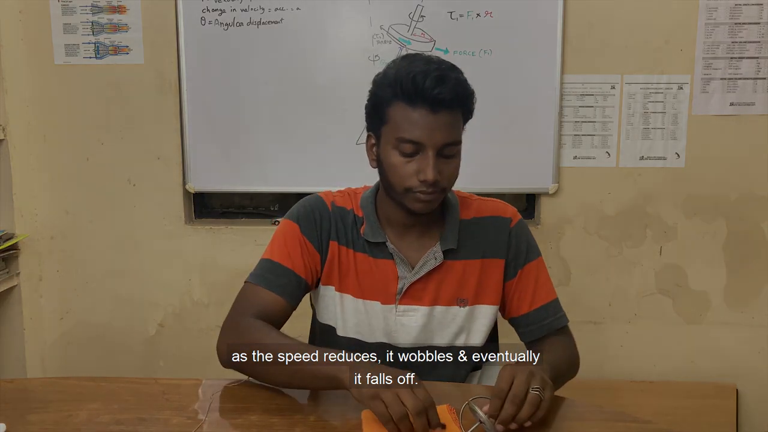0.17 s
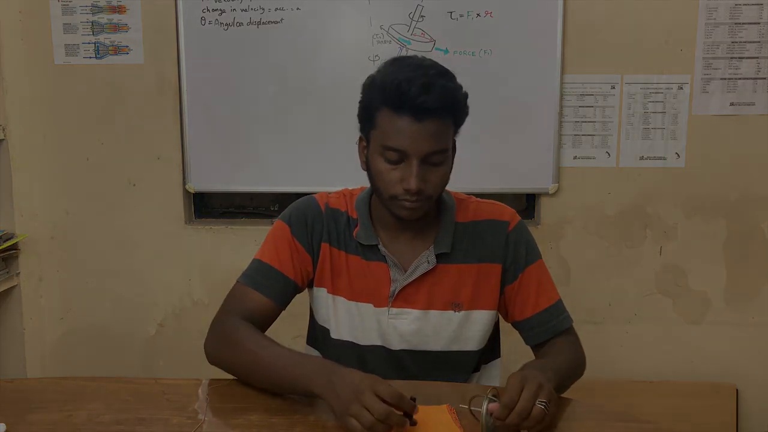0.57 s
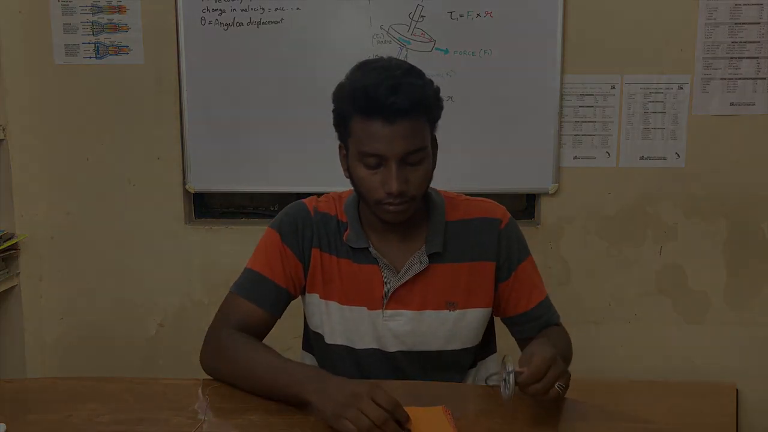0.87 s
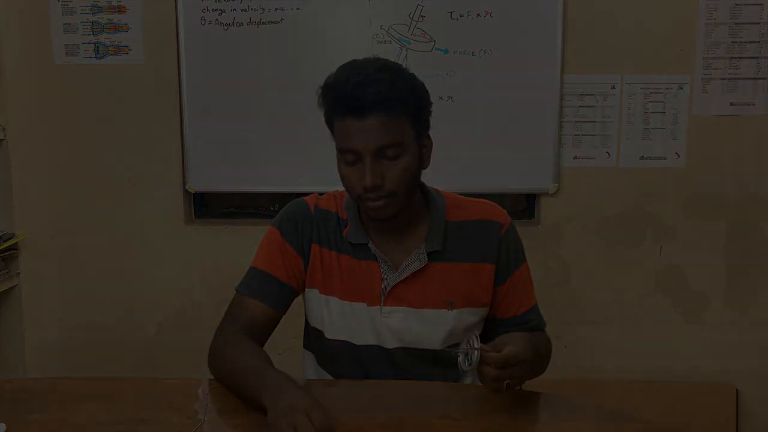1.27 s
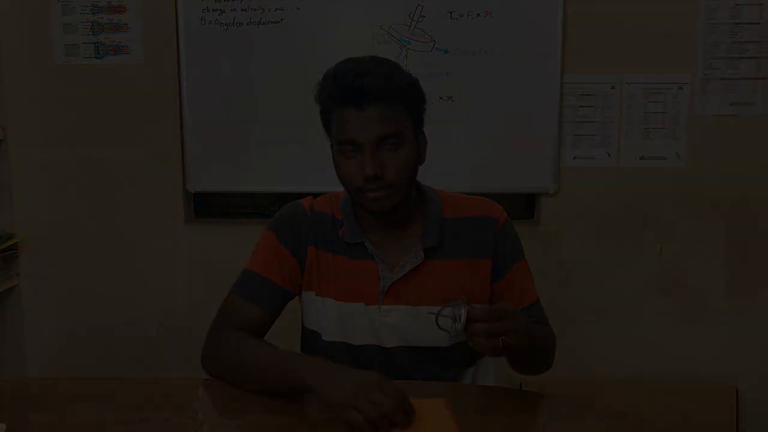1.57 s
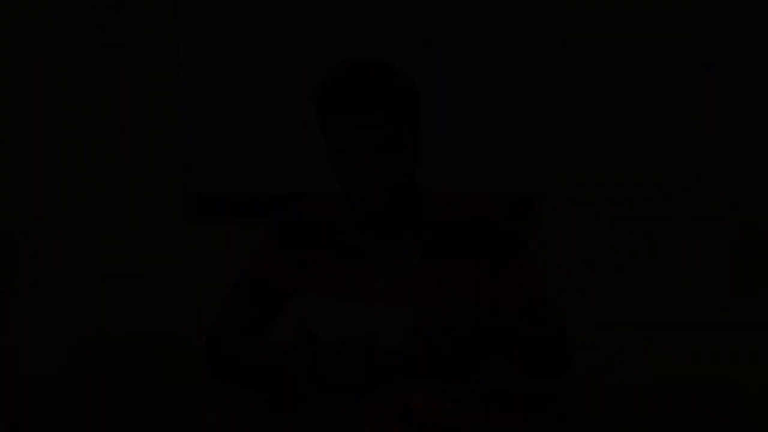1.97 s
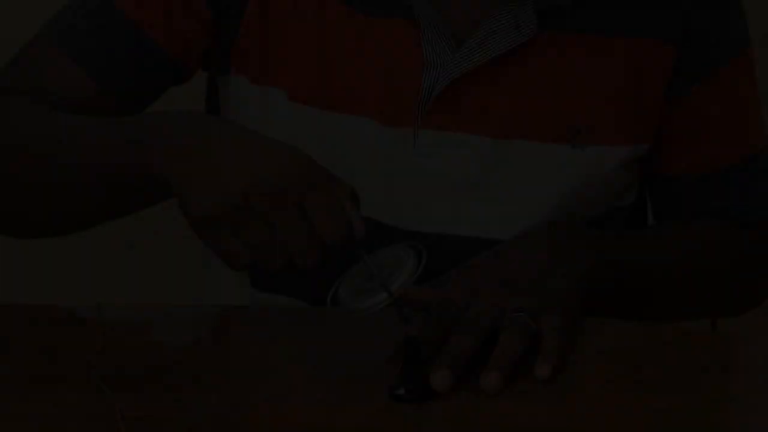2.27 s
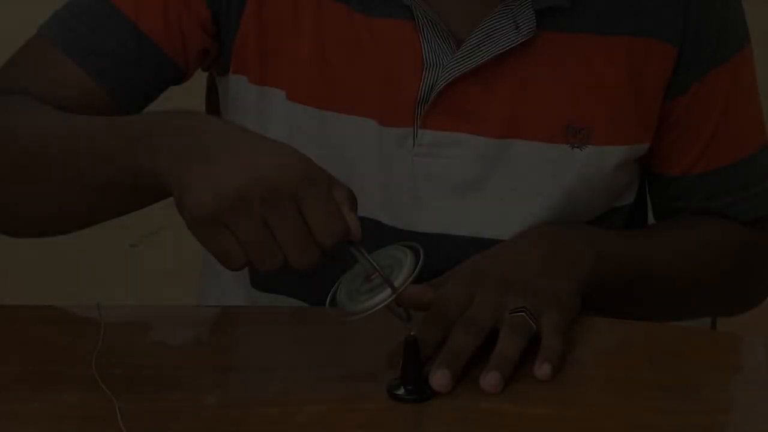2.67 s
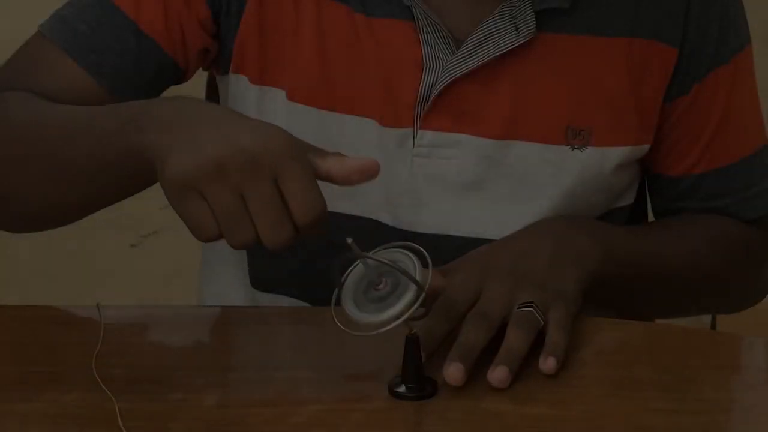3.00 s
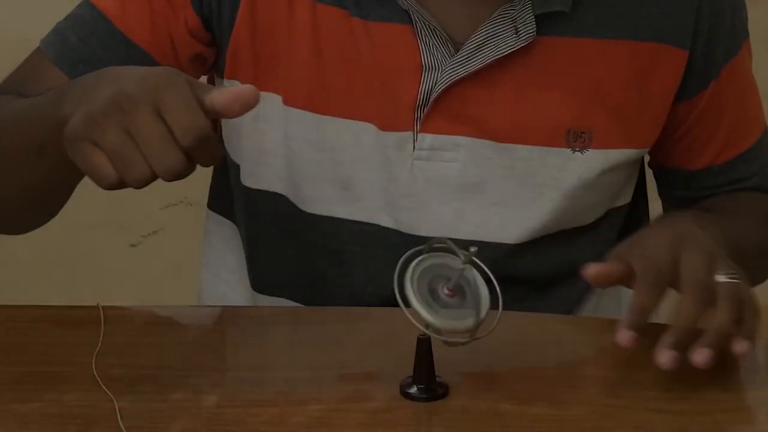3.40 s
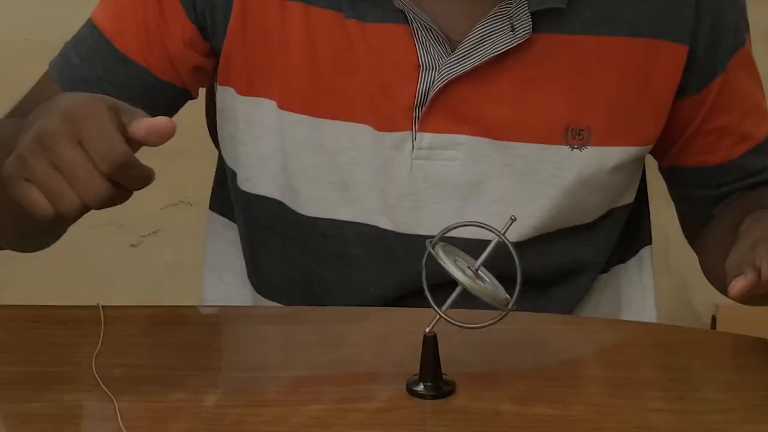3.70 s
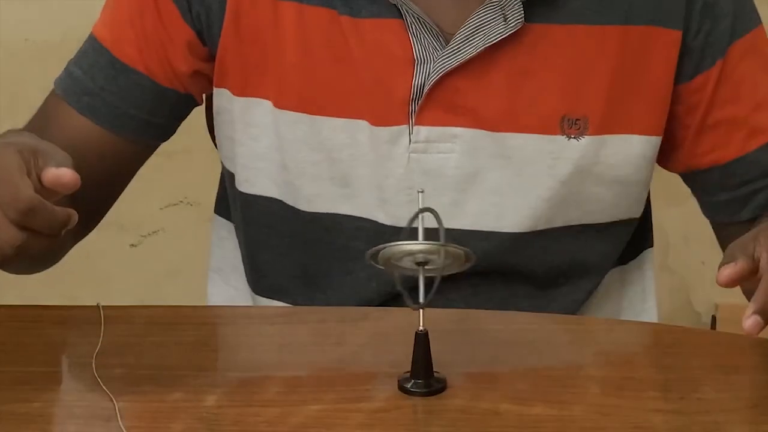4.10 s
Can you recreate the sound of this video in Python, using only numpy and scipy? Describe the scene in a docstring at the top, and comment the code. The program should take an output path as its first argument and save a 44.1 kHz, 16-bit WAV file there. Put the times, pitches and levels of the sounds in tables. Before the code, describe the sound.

A quiet small room, heard closely in stereo with short reflections from table and walls. From 0 to about 0.7 s a light metal frame skids on wood, rumbling and scraping, with brief squeals around 640 to 730 Hz; fingers damp its bright ringing near 0.24 s, and small clicks follow until 0.53 s. Faint low room tone remains, with a tiny tick at 1.08 s and a soft low bump at 1.47 s. Everything drops to silence from 1.6 to 2.1 s. Then a fast gyroscope enters abruptly, buzzing and rattling about 65 times a second, with irregular metallic knocks and a low beating boom around 2.4 s. At 2.93 s its foot grinds loudly and brightly into the stand. The rattle softens around 3.3 s, then continues to about 4.2 s with sharper knocks, fluctuating hiss, thin high steel ringing and a stronger hum near 62 Hz, slowing very slightly.

```python
"""Toy gyroscope in a quiet room

First its frame skids on a wooden table until a hand stops it: random contacts and stick-slip squeals
ring the frame; a small tick and a soft low bump follow. After a silent gap it spins fast, is set on its
stand and let go: the axle rattles in its loose bearings as trains of impulses through resonances, the
steel hisses and rings, and the unbalanced rotor hums through the table as a sine at the turning rate."""
import sys
import numpy as np
from scipy import signal
from scipy.fft import rfft, irfft
from scipy.io import wavfile
from scipy.ndimage import uniform_filter1d

SR = 44100
rng = np.random.default_rng(int(sys.argv[2]) if len(sys.argv) > 2 else 0)


def transcribe(u):
    """Save the signal u as a 16-bit wav file named by the first command-line argument.

    u: samples, shape (n,) or (channels, n), limited to [-1, 1]; the rate is SR.
    q: integer samples, one column per channel.
    """
    v = np.clip(np.atleast_2d(u).T, -1, 1)
    q = np.round(v * 32767).astype(np.int16)
    wavfile.write(sys.argv[1], SR, q)


N = 187336
TIME = np.arange(N) / SR
TAPS = 16384  # length of every filter
HZ = np.fft.rfftfreq(TAPS, 1 / SR)
SILENCE_START_S, SILENCE_END_S = 1.597, 2.093

# frame skidding on the table, relative levels: (time [s], pressure on the wood [dB], hiss [dB])
SLIDE = [(0.0, -44.5, -39), (0.188, -48.5, -43.5), (0.274, -37.5, -40), (0.392, -50, -51.5),
         (0.416, -42.5, -42), (0.552, -45, -53.5), (0.61, -59.5, -49.5), (0.706, -66, -64),
         (0.8, -104, -104)]
# broad colour of the spinning gyroscope: (frequency [Hz], gain [dB])
SPIN_SHAPE = [(40, -23), (100, -24.5), (320, -17.5), (420, -13.5), (800, -1), (1100, -6.5), (2200, -5),
              (3300, -4.5), (4300, -11.5), (5400, -13), (7400, -6), (10000, -10), (13500, 2), (15500, -10)]
# its resonances and two dips: (frequency [Hz], width [Hz], height above or below the colour [dB])
SPIN_MODES = [(163, 42, 15), (236, 39, 12.6), (299, 22, 9.3), (360, 30, 11), (385, 34, 20.5),
              (464, 38, 14.5), (502, 24, 10), (558, 40, 7), (615, 60, 6.5), (705, 60, 4.5), (752, 40, 4),
              (814, 26, 2.5), (935, 50, 3), (1130, 60, 3), (1225, 50, 2), (1320, 30, 5), (1421, 32, 1.5),
              (1786, 30, 2.5), (1908, 27, 4), (2372, 23, 3.5), (2505, 95, 1.5), (2725, 40, 2.5),
              (3110, 45, 4.5), (4080, 200, 2.5), (4310, 110, -4), (5250, 90, 3), (5390, 130, -5),
              (5880, 140, 3), (7300, 70, 3), (8164, 330, 3.1), (8841, 86, 7.5), (9362, 101, 8.8),
              (9784, 393, 9.8), (10904, 123, 10.5), (11128, 33, 7.2), (11766, 100, 10.8), (12877, 131, 4.7),
              (14833, 62, 6.5), (15283, 601, 10.9)]


def amp(db):
    """Logarithmic level: decibels to amplitude gain."""
    return 10 ** (np.asarray(db) / 20)


def unit(x):
    """Power normalization: scales to rms 1."""
    return x / np.sqrt(np.mean(x ** 2) + 1e-20)


def curves(rows):
    """Linear interpolation: each column of a table becomes a curve over time."""
    s, *columns = np.transpose(rows)
    return [np.interp(TIME, s, column) for column in columns]


def read(points, hz=HZ):
    """Logarithmic pitch scale: reads a spectrum table along log frequency."""
    f, value = np.transpose(points)
    return np.interp(np.log(hz + 1), np.log(f + 1), value)


def wander(rate_hz):
    """Low-passed noise of rms 1: chance fluctuation, mostly slower than the rate."""
    f = np.fft.rfftfreq(N, 1 / SR)
    spectrum = rfft(rng.standard_normal(N)) * np.exp(-(f / rate_hz) ** 2)
    return unit(irfft(spectrum, N))


def swell(at_s, length_s):
    """Gaussian envelope: a smooth rise and fall of height 1, down to 1/e at the length on each side."""
    return np.exp(-((TIME - at_s) / length_s) ** 2)


def body(shape, modes):
    """Modal response: the resonances of an object stand on a broad colour."""
    peaks_db = sum(db / (1 + (2 * (HZ - hz) / width) ** 2) for hz, width, db in modes)
    return amp(read(shape) + peaks_db)


def split(gain, edges_hz, order=10):
    """Power-complementary crossover: the powers of neighbouring bands add up to the whole."""
    low_passes = [1 / (1 + (HZ / hz) ** order) for hz in edges_hz]
    below = [0 * HZ] + low_passes + [1 + 0 * HZ]
    return gain * np.sqrt(abs(np.diff(below, axis=0)))


def ring(drive, gain):
    """Minimum-phase filter of energy 1: every impulse rings on only after it lands."""
    log_gain = np.log(np.maximum(gain / gain.max(), 1e-5))
    circle = np.concatenate([log_gain, log_gain[-2:0:-1]])
    response = np.fft.ifft(np.exp(np.conj(signal.hilbert(circle)))).real
    return signal.oaconvolve(drive, response / np.linalg.norm(response))[:N]


def blend(a, b, share):
    """Power-preserving mix of uncorrelated drives, with this share of the power from the second."""
    share = np.clip(share, 0, 1)
    return np.sqrt(1 - share) * a + np.sqrt(share) * b


def grit(per_second, spread_db):
    """Shot noise: tiny random contacts of unequal size."""
    size = amp(spread_db * np.minimum(rng.exponential(1, N), 4))
    landed = rng.random(N) < per_second / SR
    return unit(size * rng.choice([-1, 1], N) * landed)


def pressed(level_db, follow):
    """Friction under load: the level [dB] of a skidding noise follows the pressure on the wood."""
    usual_db = -47
    return usual_db + level_db + follow * (curves(SLIDE)[0] - usual_db)


def squeals(contact_ring, octave_db=-20, clean=.9, waver=.013):
    """Stick-slip oscillation: as the frame catches on the wood, slips lock to a mode of the ring."""
    # catches: (time [s], half length [s], level [dB], pitch [Hz])
    catches = [(.003, .02, -35, 716), (.115, .028, -36, 726), (.213, .022, -34, 722),
               (.274, .028, -33.5, 718), (.345, .025, -36, 660), (.396, .021, -28, 722),
               (.455, .018, -36, 635), (.553, .028, -26.5, 727)]
    envelope = sum(amp(db) * swell(s, length_s) for s, length_s, db, _ in catches)
    pitch_hz = curves(catches)[2] * (1 + waver * wander(31))
    slips = 2 * np.pi * np.cumsum(pitch_hz) / SR
    tone = np.sqrt(2) * (np.sin(slips) + amp(octave_db) * np.sin(2 * slips))
    return envelope * blend(contact_ring, tone, clean)


def snags(gain):
    """Impulse excitation: the frame snags on the wood and each click rings its upper modes."""
    # (time [s], level [dB])
    clicks = [(.244, -14), (.256, -11), (.268, -13), (.286, -11), (.299, -13), (.333, -17), (.432, -17),
              (.5, -16), (.511, -12), (.527, -13)]
    impulses = np.zeros(N)
    for s, db in clicks:
        impulses[round(s * SR)] = amp(db)
    return ring(impulses, gain)


def skid():
    """Friction-driven vibration: chattering contact makes the table rumble and drone, the frame ring."""
    # resonances that the frame on wood always has: (frequency [Hz], width [Hz], height above the colour [dB])
    common_modes = [(82, 26, 14), (155, 65, 21), (238, 56, 24), (390, 100, 16), (635, 75, 20),
                    (722, 90, 18), (2054, 149, 8)]
    # loose frame, ringing brightly: colour (frequency [Hz], gain [dB])
    free_shape = [(40, -8), (100, 7), (300, -14), (550, 5), (900, 3), (1200, -10.5), (1700, -0.5),
                  (2600, -6), (4200, 1), (5600, -5.5), (7400, 0.5), (10000, -5), (12500, -1), (15500, -10)]
    # and its resonances (frequency [Hz], width [Hz], height above the colour [dB])
    free_modes = [(1575, 120, 9), (1870, 170, 11), (4810, 260, 14), (7010, 200, 10), (8170, 120, 10),
                  (8870, 70, 10), (9620, 90, 14), (11000, 220, 11), (11800, 130, 12)]
    # frame in closed fingers, lower and damped: colour (frequency [Hz], gain [dB])
    held_shape = [(40, -8.5), (100, -4.5), (300, -8.5), (550, 0.5), (900, 1.5), (1250, 6), (1650, 0.5),
                  (2500, -2.5), (3400, -1.5), (5600, -11), (7400, -4), (10000, -5.5), (12500, -9),
                  (15500, -15.5)]
    # and its resonances (frequency [Hz], width [Hz], height above the colour [dB])
    held_modes = [(1080, 180, 4), (1465, 150, 10), (1850, 150, 6), (2500, 120, 4), (3280, 160, 4),
                  (3560, 200, 3), (4620, 330, 7), (7450, 500, 3), (11000, 250, 7), (11600, 400, 8)]
    # frame bears down on the table or lifts from it: (time [s], half length [s], change of level [dB])
    leans = [(.14, .035, -9), (.285, .04, 3), (.455, .022, 8), (.505, .02, 5)]
    edges_hz = [195, 520, 950, 4300]
    free = split(body(free_shape, common_modes + free_modes), edges_hz)
    held = split(body(held_shape, common_modes + held_modes), edges_hz)
    grip_s, gripping_s = 0.24, 0.034  # the fingers close: middle and duration
    grip = np.clip(.5 + (TIME - grip_s) / gripping_s, 0, 1)

    contact = unit(blend(grit(5000, 4), grit(600, 3), 0.25) * amp(1.2 * wander(45)))
    lean_db = sum(db * swell(s, length_s) for s, length_s, db in leans)
    stopped_db = np.interp(TIME, [.8, .9], [0, -60])
    bands_db = [pressed(-9, follow=1) + lean_db,  # rumble
                pressed(2.5, follow=1.04) + lean_db,  # drone
                pressed(4.5, follow=1.26),  # ring
                pressed(-1, follow=0.95),  # scrape
                curves(SLIDE)[1] + 4]  # hiss
    rubbing = np.zeros(N)
    for level_db, free_gain, held_gain in zip(bands_db, free, held):
        drive = contact * amp(level_db + stopped_db)
        rubbing += ring(drive * np.sqrt(1 - grip), free_gain)
        rubbing += ring(drive * np.sqrt(grip), held_gain)
    return rubbing + squeals(ring(contact, held[2])) + snags(np.hypot(held[3], held[4]))


def room_tone():
    """Partly correlated noise: a faint low rumble, mostly alike in both channels."""
    # spectrum: (frequency [Hz], relative density [dB])
    air = [(20, -25), (45, -12), (82, 2), (130, -7), (240, -5), (500, -14), (1000, -22), (2000, -30),
           (4000, -40), (8000, -41), (12000, -43), (16000, -52)]
    # mean level of the channels: (time [s], level [dB])
    air_level = [(.6, -57), (.8, -61.5)]
    shared, left, right = (ring(rng.standard_normal(N), amp(read(air))) for _ in range(3))
    both = blend(shared, np.array([left, right]), 0.067)
    return amp(curves(air_level)[0]) * both * amp([[1.2], [-1.2]])


def tick(at_s=1.0803, level_db=-43.5, crack_s=0.0033, tail_db=-16, tail_s=.035):
    """Two-stage exponential decay: a small tick of filtered noise with a short tail."""
    # colour: (frequency [Hz], gain [dB])
    tick_shape = [(150, -12), (600, -2), (1200, 0), (2200, -8), (3600, -7), (5200, -25), (7500, -17),
                  (15000, -34)]
    # resonance: (frequency [Hz], width [Hz], height above the colour [dB])
    tick_modes = [(1300, 380, 14)]
    t = np.maximum(TIME - at_s, 0)
    envelope = np.exp(-t / crack_s) + amp(tail_db) * np.exp(-t / tail_s)
    burst = (TIME > at_s) * envelope * rng.standard_normal(N)
    return amp(level_db) * ring(burst, body(tick_shape, tick_modes))


def bump(at_s=1.468, level_db=-43, rise_s=0.014):
    """Damped free vibration: one soft blow on a few low modes."""
    # modes: (frequency [Hz], relative level [dB], time to decay by 60 dB [s])
    bump_modes = [(113.6, 6.5, 0.25), (143, -2, 0.1)]
    t = np.maximum(TIME - at_s, 0)
    tone = sum(amp(db - 60 * t / t60) * np.sin(2 * np.pi * hz * t) for hz, db, t60 in bump_modes)
    return amp(level_db) * tone * (1 - np.exp(-t / rise_s))


def seated():
    """Change of support: goes from 0 in the hand to 1 on the stand as the foot settles."""
    seat_s, settle_s = 3.43, 0.32
    return np.clip(.5 + (TIME - seat_s) / settle_s, 0, 1)


def loaded(level_db, follow, seated_db=0, waver_db=0, waver_hz=1):
    """Load-dependent bearing noise: gain follows the load, changes on the stand and wavers by chance."""
    # side load as the gyroscope is carried, set down and leans: (time [s], load [dB])
    side_load = [(2.1, -26), (2.19, -27), (2.22, -25), (2.28, -26.5), (2.3, -25.5), (2.32, -26),
                 (2.49, -24), (2.51, -28), (2.64, -23.5), (2.9, -24), (2.96, -21), (3.15, -25), (3.27, -21),
                 (3.46, -24.5), (3.57, -22.5), (3.64, -24), (4.07, -21.5), (4.24, -25.5)]
    usual_db = -26
    excess_db = curves(side_load)[0] - usual_db
    waver = waver_db * wander(waver_hz)
    return amp(usual_db + level_db + follow * excess_db + seated_db * seated() + waver)


def clatter(turns, scatter, spread_db, bounce_s, chatter):
    """Periodic impact: once a turn the axle drops across its bearing play, then chatters briefly."""
    at = np.flatnonzero(np.diff(np.floor(turns + scatter * wander(60))) > 0)
    blows = np.zeros(N)
    blows[at] = amp(spread_db * np.clip(rng.standard_normal(len(at)), -2, 1))
    force = signal.lfilter([1], [1, -np.exp(-1 / (bounce_s * SR))], blows)
    hits = unit(blows * rng.choice([-1, 1], N))
    return blend(hits, unit(force * rng.standard_normal(N)), chatter)


def steel(drive, level_db=-11, width_hz=30):
    """High-Q resonance: noise makes the rotor's high modes ring on as thin, wavering tones."""
    # modes: (frequency [Hz], relative level [dB])
    rotor_modes = [(7780, -53), (9370, -49), (9604, -47), (9744, -44), (10896, -48), (11127, -52),
                   (11763, -39), (14831, -50), (15197, -48), (15510, -48)]
    power = sum(amp(2 * db) / (1 + (2 * (HZ - hz) / width_hz) ** 2) ** 2 for hz, db in rotor_modes)
    return amp(level_db) * ring(drive, np.sqrt(power))


def hum(turns):
    """Forced vibration and beats: unbalance hums once a turn; in the hand a low boom beats against it."""
    # level, growing as the stand takes the weight: (time [s], rms level [dB])
    hum_level = [(2.1, -58), (2.3, -47.5), (2.7, -45), (2.9, -51), (2.985, -41), (3.03, -47), (3.09, -36.5),
                 (3.17, -41), (3.43, -37), (3.57, -41), (3.75, -37.5), (4.24, -36)]
    beat_hz, boom_at_s, boom_length_s, boom_db = 16.7, 2.445, 0.22, -47.5
    boom = np.sin(2 * np.pi * (turns + beat_hz * (TIME - boom_at_s)))
    boom *= amp(boom_db) * swell(boom_at_s, boom_length_s)
    return np.sqrt(2) * (np.sin(2 * np.pi * turns) * amp(curves(hum_level)[0]) + boom)


def spin():
    """Forced modal vibration: bearing grit and once-a-turn blows ring the frame, rotor and table."""
    # rotor: (time [s], speed [turns/s])
    speed = [(2.09, 66.8), (2.7, 64.5), (3.25, 63.0), (3.75, 62.0), (4.25, 61.4)]
    # how hard the axle strikes metal: (time [s], gain on the top of the rattle [dB])
    bite = [(2.1, -8.5), (2.6, -16), (3.0, -18), (3.4, -14), (3.8, -4), (4.2, -4)]
    # hiss of the pivots: (time [s], relative level [dB])
    hiss_level = [(2.1, -29), (2.18, -34), (2.24, -31), (2.28, -31), (2.29, -31), (2.34, -31),
                  (2.35, -29.5), (2.56, -30.5), (2.59, -28.5), (2.87, -29.5), (2.88, -27.5), (2.91, -28),
                  (2.96, -24), (3.14, -30), (3.27, -28.5), (3.52, -30.5), (3.55, -24.5), (3.64, -29.5),
                  (3.73, -24.5), (3.75, -30), (4.05, -23), (4.24, -31.5)]
    turns = np.cumsum(curves(speed)[0]) / SR
    turns -= np.interp(2.6113, TIME, turns)  # count from a moment [s] at which the axle drops
    blows = clatter(turns, scatter=.035, spread_db=1.5, bounce_s=.0013, chatter=.85)
    held_share, seated_share = .72, .45  # share of the rattle's power in blows, which blur on the stand
    share = held_share + (seated_share - held_share) * seated()

    lift_s, lifting_s = 2.52, 0.18  # the frame brushes the table until the hand lifts it
    touching = np.clip(.5 - (TIME - lift_s) / lifting_s, 0, 1)
    grinding = swell(2.93, 0.11)  # the foot grinds into the cup of the stand
    softer = swell(3.33, 0.21)  # the rattle is softer for a while
    nod_hz, nod_at_s, nod_sharpness = 1.877, 3.15, 5  # the axle nods; the whirr thins out once a nod
    nodding = np.exp(nod_sharpness * (np.cos(2 * np.pi * nod_hz * (TIME - nod_at_s)) - 1))

    drone_gain = loaded(-20.5 + 9 * touching + 5 * grinding, follow=0.68)
    whirr_gain = loaded(-6 + 0.5 * touching - 4 * nodding, follow=1,
                        seated_db=3.5, waver_db=1.0, waver_hz=31)
    rattle_gain = loaded(-0.5 - softer, follow=1.404, seated_db=0.5, waver_db=0.6, waver_hz=35.6)
    hiss_gain = amp(curves(hiss_level)[0] + 4 + .5 * wander(5))

    table, low, middle, high = split(body(SPIN_SHAPE, SPIN_MODES), [310, 950, 4700])
    drone = ring(grit(3000, 0.78) * drone_gain, table)
    whirr = ring(blend(grit(2800, 2), blows, 0.23 * share) * whirr_gain, low)
    rattle = ring(blend(grit(2200, 2.4), blows, share) * rattle_gain, middle)
    high_pass = signal.butter(2, 2400, "high", fs=SR, output="sos")
    top = signal.sosfiltfilt(high_pass, rattle)
    rattle = rattle + (amp(curves(bite)[0]) - 1) * top
    rubbing = unit(grit(7000, 0.89) * amp(1.6 * wander(41)))  # the pivots grab and slip
    scraping = blend(rubbing, blows, 0.12) * hiss_gain
    return drone + whirr + rattle + ring(scraping, high) + steel(scraping) + hum(turns)


def add(mix, s, sound):
    """Superposition: adds a sound to the mix at a time."""
    part = mix[round(s * SR):][:len(sound)]
    part += sound[:len(part)]


def knocks(bounce_s=0.0001, low_hz=800, chatter=0.16, chatter_s=0.0015):
    """Impact excitation: harder blows favour the modes near the struck spot's pitch and chatter briefly."""
    # axle in its bearings and foot on the stand:
    # (time [s], relative strength [dB], treble against it [dB], favoured frequency [Hz])
    hard_blows = [(2.1213, -1, -8, 1800), (2.2021, -3, -5, 1300), (2.2125, -3, -4, 2500),
                  (2.2445, -4, -3, 1500), (2.2909, -2, 5, 1300), (2.3513, -2, 3, 1300),
                  (2.3655, -2, -8, 1200), (2.4116, -4, -3, 2400), (2.4421, -1, 1, 3700),
                  (2.457, -1, -3, 2900), (2.484, -3, 3, 1000), (2.5792, -4, -2, 2500), (2.5962, 0, 1, 1500),
                  (2.6108, 0, -8, 2500), (2.6265, -2, -4, 1300), (2.641, -1, -2, 1500),
                  (2.6884, 1, -2, 1400), (2.7207, -1, 0, 1300), (2.8117, -3, -5, 2300),
                  (2.8756, 2, 0, 1400), (2.9055, -2, -4, 3000), (2.925, 2, -2, 1400), (2.9364, 6, -8, 2100),
                  (2.9559, 7.5, -1, 1900), (2.968, 3, 3, 1300), (2.984, -1, -1, 1800), (2.999, 0, 0, 1500),
                  (3.078, -1, -4, 3100), (3.2364, -3, 2, 1900), (3.2522, -2, 1, 1600),
                  (3.5381, 0, -7, 1200), (3.5874, 0, -6, 2500), (3.6678, -2, 0, 2500),
                  (3.6847, 1, -2, 2600), (3.7152, 2, -6, 1000), (3.797, 5, -11, 3100),
                  (3.8783, 0, -7, 3100), (3.928, 3, -9, 2700), (4.0394, 1, 4, 3100), (4.061, 0, 2, 2500),
                  (4.105, 0, -3, 3300), (4.1367, 0, 1, 2700)]
    spot_width_hz, spot_db = 650, 9
    t = np.arange(round(.02 * SR)) / SR
    _, middle, high = split(body(SPIN_SHAPE, SPIN_MODES), [low_hz, 4700])
    softness = 1 / np.hypot(1, HZ * bounce_s)
    dull, bright = np.zeros((2, N))
    for s, db, treble_db, hz in hard_blows:
        rebounds = rng.standard_normal(len(t)) * np.exp(-t / chatter_s)
        rebounds /= np.linalg.norm(rebounds)
        blow = amp(db) * blend(t == 0, rebounds, chatter)
        spot = amp(spot_db / (1 + (2 * (HZ - hz) / spot_width_hz) ** 2))
        add(dull, s, ring(blow, middle * softness * spot))
        add(bright, s, amp(db + treble_db) * rebounds)
    return dull + ring(bright, high)


def grind(at_s=2.932, level_db=-22, attack_s=0.018, release_s=0.11):
    """Dry friction: the foot scrapes into the cup of the stand in one dense, bright burst of contacts."""
    # colour: (frequency [Hz], gain [dB])
    scrape_shape = [(300, -30), (800, -8), (1250, -1), (1800, 2), (3000, -4), (4400, -5), (6500, -9),
                    (9000, -15), (15000, -20)]
    t = np.maximum(TIME - at_s, 0)
    envelope = np.minimum(t / attack_s, 1) * np.exp(-np.maximum(t - attack_s, 0) / release_s)
    return ring(grit(5700, 2.1) * amp(level_db) * envelope, amp(read(scrape_shape)))


def room(x):
    """Reverberation and interchannel phase: table and walls add a tail that differs at each port."""
    # two microphone ports: (frequency [Hz], lead of the left [rad])
    port_phase = [(60, 0), (600, 0), (2000, .3), (4200, .3), (5500, 1.9), (6400, .1), (7400, -.1),
                  (9050, -3.1), (11400, -6.3), (13500, -9.4), (15700, -12.5)]
    # and their balance: (frequency [Hz], left minus right [dB])
    port_balance = [(60, 2.3), (300, 3.2), (1000, 2.1), (2500, 1.3), (5000, .3), (15000, 0)]
    # reverberation: (frequency [Hz], level over direct sound [dB])
    wetness = [(60, -30), (160, -12), (300, -9), (420, -6), (700, 4), (1200, 7), (2500, 5), (5000, 1),
               (7000, -4), (9000, -10), (15000, -11)]
    # its decay: (frequency [Hz], time to decay by 60 dB [s])
    decay_time = [(100, 0.45), (700, 0.21), (5000, 0.18), (15000, 0.06)]
    early_db, early_s = 19, .007  # the table and near walls answer first: height above the tail, fade
    scatter = rng.standard_normal((2, TAPS)) * (np.arange(TAPS) > .0015 * SR)
    hz, t, z = signal.stft(scatter, SR, nperseg=256)
    decay = amp(-60 * t / read(decay_time, hz)[:, None] + early_db * np.exp(-t / early_s))
    tail = rfft(signal.istft(z * decay, SR, nperseg=256)[1][:, :TAPS])
    tail /= np.sqrt(uniform_filter1d(abs(tail) ** 2, size=200, axis=1))

    half_phase, wet = read(port_phase) / 2, amp(read(wetness)) / np.sqrt(2)
    direct = np.array([np.cos(half_phase), 1j * np.sin(half_phase)])  # mid and side
    paths, power = direct + wet * tail, abs(direct) ** 2 + wet ** 2
    # the room keeps the broad colour
    smooth = uniform_filter1d(abs(paths) ** 2, size=30, axis=1)
    mid, side = paths * np.sqrt(power / power.sum(0) / smooth)
    both = np.array([mid + side, mid - side])
    both /= np.sqrt(uniform_filter1d(abs(both) ** 2, size=60, axis=1))
    both *= amp(np.array([[.5], [-.5]]) * read(port_balance))
    lead = 256  # samples kept ahead of the direct sound for the phase leads
    response = np.roll(irfft(both), lead, axis=1)[:, :-4 * lead]
    return signal.oaconvolve(x[None], response, axes=1)[:, lead:lead + N]


def scene():
    """Superposition: the skid, tick and bump come first, then the fast spin; the room answers them all."""
    first = skid() + tick() + bump()
    second = (spin() + knocks() + grind()) * (TIME > SILENCE_END_S - .05)
    return room(first + second) + room_tone()


def record(dry):
    """Gating, clipping and band limiting: all sound drops out in the gap, peaks clip, the top is cut."""
    ceiling, edge_hz = .92, 15800
    outside_gap = (TIME < SILENCE_START_S) | (TIME > SILENCE_END_S)
    live = uniform_filter1d(1. * outside_gap, size=64)
    low_pass = signal.firwin(1023, edge_hz, window=("kaiser", 9), fs=SR)
    return signal.oaconvolve(np.clip(dry * live, -ceiling, ceiling), low_pass[None], "same")


dry = scene()
out = record(dry)
transcribe(out)
```